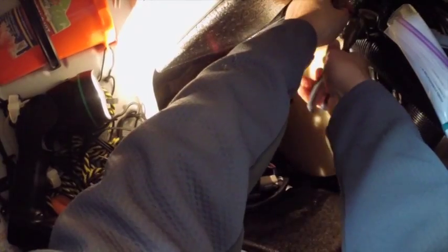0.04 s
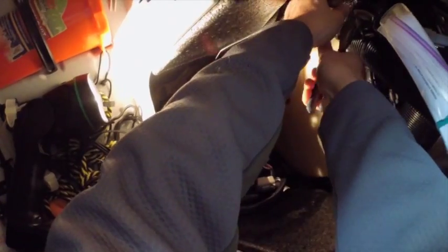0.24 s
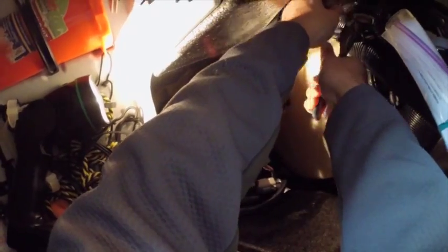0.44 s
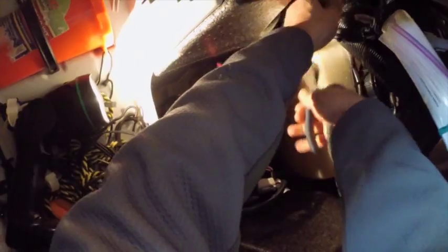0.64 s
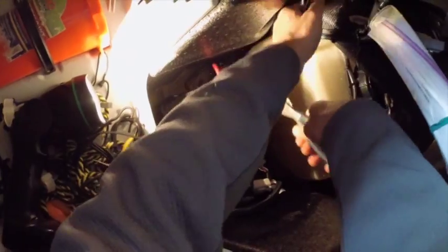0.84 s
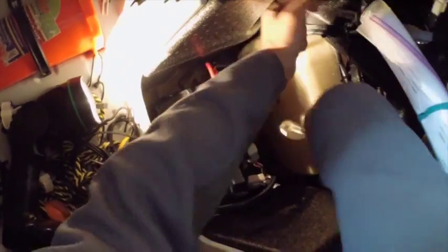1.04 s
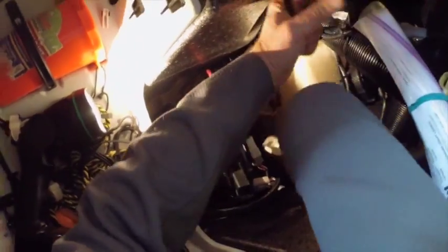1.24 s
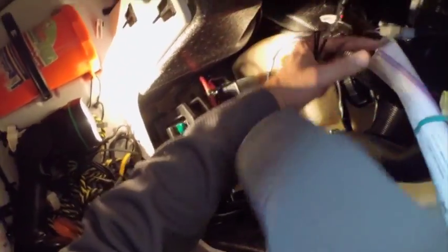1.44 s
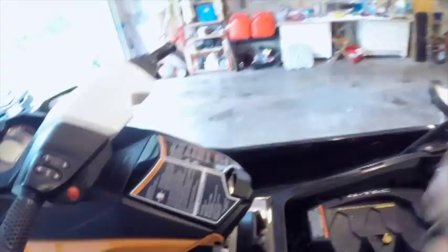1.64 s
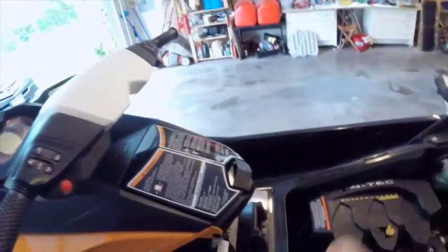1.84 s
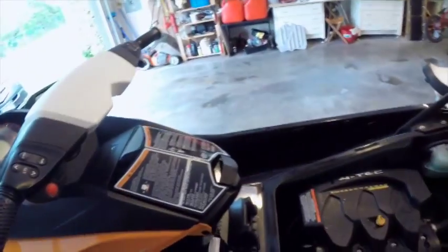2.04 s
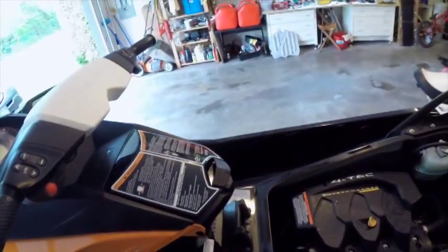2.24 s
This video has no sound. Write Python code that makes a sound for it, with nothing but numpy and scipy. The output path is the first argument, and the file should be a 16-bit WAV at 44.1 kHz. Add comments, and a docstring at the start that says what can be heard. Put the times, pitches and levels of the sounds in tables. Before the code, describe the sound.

A sharp snip of side cutters through a plastic cable tie, over faint hiss and low body rumble

```python
"""Cable tie snipped in a hull

Side cutters snip a plastic cable tie inside a watercraft hull, in a garage: two clicks (tie cracks, jaws
close), decaying sines (tool and hull ring) and slow wobbles (jolts of the body-worn microphone).
Coloured noise makes sleeve strokes, tool ticks, hiss and body rumble. A gain control ducks the snip and
what follows; near the end the background drops abruptly and swells back.
"""
import sys
import numpy as np
from scipy import signal
from scipy.fft import rfft, irfft
from scipy.io import wavfile
from scipy.ndimage import uniform_filter1d

SR = 44100
rng = np.random.default_rng(int(sys.argv[2]) if len(sys.argv) > 2 else 0)


def int16_out(signal):
    """Quantize to a 16-bit WAV file."""
    q = np.round(np.clip(np.atleast_2d(signal).T, -1, 1) * 32767)
    wavfile.write(sys.argv[1], SR, q.astype(np.int16))


N = 101121
T = np.arange(N) / SR  # time [s]

# Tie crack, then jaw closure: (time [s], level before CRACK_DB [dB])
SNIP_BLOWS = [(0.4642, -1), (0.4667, -3.5)]
# Ring of cutters and hull: (frequency [Hz], level before RING_DB [dB], T60 [s])
RING_MODES = [(1850, -14, .036), (1995, -7, .046), (2150, -9, .038), (2330, -12, .038), (2660, -10, .026),
              (3390, -11, .032), (3585, -11, .034), (4480, -.5, .03), (4820, -1, .019), (5280, -7, .02),
              (6500, -6, .03), (6720, -3, .03), (7240, -8, .028), (7520, -8, .032)]
RING_DB, RING_RISE_S = -15, .0003
# Colour of the crack and its scatter round the hull: (frequency [Hz], relative gain [dB])
CRACK_COLOUR = [(300, -34.5), (950, -33), (1200, -16.5), (1480, -18), (1750, -2), (2600, 2), (2950, -7),
                (3500, -1), (4050, -7.5), (4600, -0.5), (5200, 3), (5700, -6.5), (6800, 3), (8400, -2),
                (9200, -1.5), (9800, -14.5), (10900, -9), (13000, -22.5), (15300, -27)]
CRACK_DB, CRACK_SPREAD_S = 3.5, 0.001566
SCATTER_DB, SCATTER_T60_S, SCATTER_RISE_S = -20.5, 0.053, .004
# Jolts of the microphone: (centre [s], frequency [Hz], level [dB], half length to 1/e [s])
JOLTS = [(0.4899, 52.6, -24.5, 0.014), (0.902, 44.4, -29.5, .02)]
# Light knocks of the tool: (time [s], level [dB])
TICK_KNOCKS = [(0.426, -45), (1.061, -48.5), (1.1245, -42.5), (1.2476, -37), (1.5927, -46)]
# Resonances of the knocked plastic: (frequency [Hz], relative gain [dB])
TICK_COLOUR = [(500, -17.5), (1800, -18), (2750, 6), (3050, -4), (3400, 10.5), (3850, -2), (4400, 2),
               (4800, 0), (5300, 0.5), (6200, -11), (8000, -22), (15000, -34)]
TICK_T60_S, TICK_RISE_S = 0.044, .0005
# Sleeve strokes: (centre [s], half length to 1/e [s], level [dB])
SLEEVE_STROKES = [(0.192, 0.027, -60.5), (0.887, 0.021, -56), (1.07, .05, -60), (1.181, 0.048, -50),
                  (1.614, .025, -48.5)]
# Colour of the cloth: (frequency [Hz], relative gain [dB])
CLOTH_COLOUR = [(300, 1), (1000, -16), (1700, 7), (2300, -4.5), (2800, 10.5), (3150, -2), (3500, 4),
                (3900, -8), (4600, -1.5), (7000, -9.5), (9500, -24), (10600, -10.5), (12000, -30),
                (15000, -25)]
CLOTH_GRAIN_DB = 2  # rms swing of the level
GARAGE_DB, GARAGE_T60_S = -28, .33
# Colour of the garage hiss: (frequency [Hz], relative density [dB per Hz])
HISS_COLOUR = [(59, -15.5), (100, 0), (208, -2), (279, -3.5), (324, -6), (482, -7.5), (546, -9), (594, -8),
               (764, -10.5), (1810, -14.5), (2750, -15), (3050, -16), (3320, -17), (13200, -36),
               (15000, -45)]
HISS_DB = -49.5  # before BACKGROUND_LEVEL
# Rumble of the moving body: (time [s], level before BACKGROUND_LEVEL [dB])
MOTION_LEVEL = [(0, -42), (0.07, -48), (0.33, -41), (0.44, -44.5), (0.62, -36.5), (0.82, -47.5),
                (0.91, -41), (0.98, -37.5), (1.1, -39.5), (1.33, -36), (1.52, -41.5), (1.62, -36.5),
                (1.72, -36.5), (1.93, -39), (2.08, -41.5), (2.29, -45.5)]
# Colour of that rumble: (frequency [Hz], relative gain [dB])
RUMBLE_COLOUR = [(8, -3), (20, 3), (35, 1.5), (58, -8), (80, -7.5), (110, -26), (200, -41.5), (500, -70.5)]
# Background gain, with the drop and swell: (time [s], gain [dB])
BACKGROUND_LEVEL = [(0, 1), (1.0, 0), (1.69, 1), (1.70, -13.5), (1.85, -10.5), (2.05, -6.5), (2.29, -2)]
DULL_AT_S, DULL_HZ = 1.695, 12900
# SQUEEZE: dB of gain reduction per dB over the limit
LIMIT_DB, SQUEEZE, HOLD_FALL_DB_PER_S, REACT_S = -29, 0.45, 28, 0.057
EDGE_HZ = 15250


def amp(db):
    """Decibels to gain."""
    return 10 ** (np.asarray(db) / 20)


def unit(x):
    """Scale to rms 1."""
    return x / np.sqrt(np.mean(x ** 2) + 1e-20)


def curve(points):
    """Gain over time from (time [s], level [dB]) points."""
    return amp(np.interp(T, *np.transpose(points)))


def gain_at(freq_hz, spectrum):
    """Gain read from (frequency [Hz], gain [dB]) points on a log frequency axis."""
    hz, db = np.transpose(spectrum)
    return amp(np.interp(np.log(freq_hz + 1), np.log(hz), db))


def noise(spectrum):
    """Coloured noise of rms 1."""
    gain = gain_at(np.fft.rfftfreq(N, 1 / SR), spectrum)
    return unit(irfft(rfft(rng.standard_normal(N)) * gain, N))


def colour(x, spectrum):
    """Minimum-phase filter of the given shape; keeps the power of white noise."""
    log_gain = np.log(gain_at(abs(np.fft.fftfreq(4096, 1 / SR)), spectrum))
    response = np.exp(np.conj(signal.hilbert(log_gain)))
    taps = np.fft.ifft(response).real[:2048]
    return signal.fftconvolve(x, taps / np.linalg.norm(taps))[:N]


def lowpass(x, hz):
    """Steep linear-phase low-pass."""
    taps = signal.firwin(401, hz, window=("kaiser", 8), fs=SR)
    return signal.fftconvolve(x, taps, "same")


def strike(at_s, rise_s, t60_s):
    """Envelope of a blow: linear rise times exponential decay."""
    age_s = np.maximum(T - at_s, 0)
    return np.minimum(age_s / rise_s, 1) * amp(-60 * age_s / t60_s)


def swell(at_s, half_s):
    """Bell-shaped envelope."""
    return np.exp(-((T - at_s) / half_s) ** 2)


def click(at_s, spread_s):
    """Click of even spectrum whose frequencies arrive scattered over a short time."""
    hz = np.fft.rfftfreq(N, 1 / SR)
    scatter = np.interp(hz, np.linspace(0, SR / 2, num=28), rng.random(size=28))
    delay_s = at_s + spread_s * scatter
    phase = -2 * np.pi * np.cumsum(delay_s) * hz[1]  # delay integrated over frequency
    return irfft(np.exp(1j * phase), N) * (T >= at_s)


def snip():
    """Tie cracks and excites the modes, jaws clack shut, hull scatters the sound as decaying noise."""
    start_s = SNIP_BLOWS[0][0]
    ring = np.zeros(N)
    for k, (hz, db, t60_s) in enumerate(RING_MODES):
        polarity = (-1) ** k
        tone = np.sin(2 * np.pi * hz * (T - start_s))
        ring += polarity * amp(db) * strike(start_s, RING_RISE_S, t60_s) * tone
    blows = sum(amp(db) * click(at_s, CRACK_SPREAD_S) for at_s, db in SNIP_BLOWS)
    scatter = rng.standard_normal(N) * strike(start_s, SCATTER_RISE_S, SCATTER_T60_S)
    crack = colour(amp(CRACK_DB) * blows + amp(SCATTER_DB) * scatter, CRACK_COLOUR)
    return amp(RING_DB) * ring + crack


def thump():
    """Jolt of the cut, then the arm pulling back: each shakes the microphone for about two slow cycles."""
    return sum(amp(db) * swell(at_s, half_s) * np.sin(2 * np.pi * hz * (at_s - T))
               for at_s, hz, db, half_s in JOLTS)


def ticks():
    """Tool knocks plastic lightly: decaying noise through the plastic's resonances."""
    knocks = sum(amp(db) * strike(at_s, TICK_RISE_S, TICK_T60_S) for at_s, db in TICK_KNOCKS)
    return colour(knocks * rng.standard_normal(N), TICK_COLOUR)


def sleeves():
    """Sliding cloth: coloured noise of grainy level, in soft strokes."""
    grain_db = CLOTH_GRAIN_DB * unit(uniform_filter1d(rng.standard_normal(N), size=130))
    cloth = unit(noise(CLOTH_COLOUR) * amp(grain_db))
    return cloth * sum(amp(db) * swell(at_s, half_s) for at_s, half_s, db in SLEEVE_STROKES)


def garage(x):
    """Faint diffuse reverberation: convolution with decaying noise."""
    tail = (rng.standard_normal(N) * strike(.004, .006, GARAGE_T60_S))[:SR // 2]
    return amp(GARAGE_DB) * signal.fftconvolve(x, tail / np.linalg.norm(tail))[:N]


def background():
    """Steady hiss and body rumble under one level curve; duller after the drop."""
    bed = amp(HISS_DB) * noise(HISS_COLOUR) + curve(MOTION_LEVEL) * noise(RUMBLE_COLOUR)
    return curve(BACKGROUND_LEVEL) * np.where(T < DULL_AT_S, bed, lowpass(bed, DULL_HZ))


def scene():
    """Sum of all sources at one microphone; only the near ones reverberate."""
    near = snip() + ticks() + sleeves()
    return (near + garage(near) + thump() + background())[None]


def record(dry):
    """Gain control ducks on loud sound and recovers slowly; then the band limit."""
    x = dry[0]
    power_db = 10 * np.log10(abs(uniform_filter1d(x ** 2, size=220)) + 1e-12)
    fall_db = HOLD_FALL_DB_PER_S * T
    held_db = np.maximum.accumulate(power_db + fall_db) - fall_db  # peak hold, falling steadily
    over_db = np.maximum(held_db - LIMIT_DB, 0)
    keep = np.exp(-1 / (REACT_S * SR))
    duck_db = SQUEEZE * signal.lfilter([1 - keep], [1, -keep], over_db)
    return lowpass(x * amp(-duck_db), EDGE_HZ)[None]


dry = scene()
out = record(dry)
int16_out(out)
```